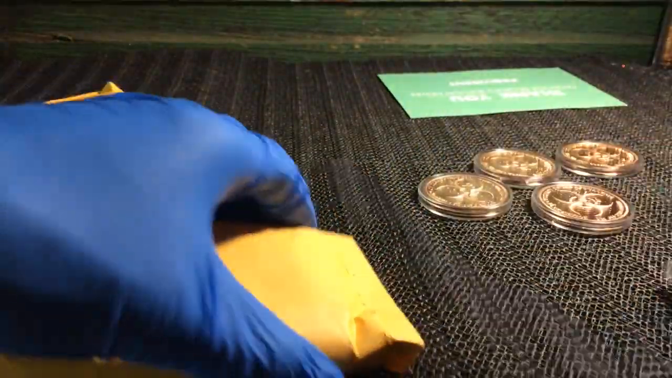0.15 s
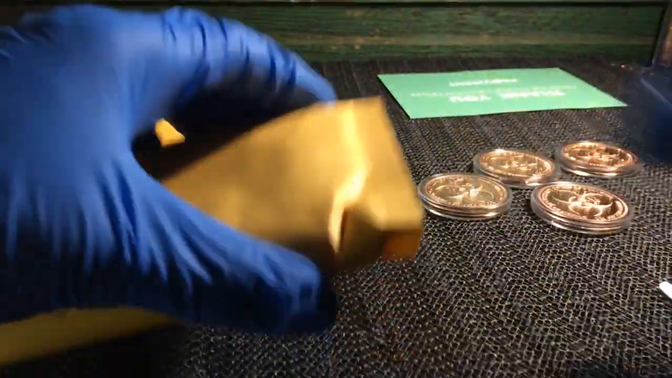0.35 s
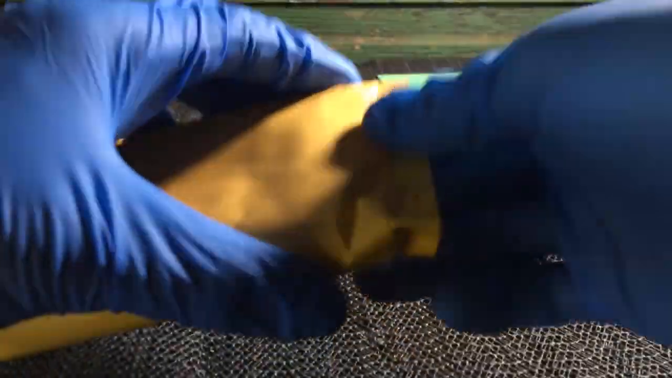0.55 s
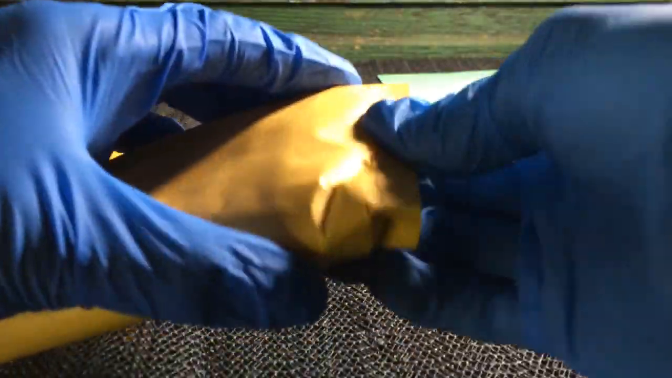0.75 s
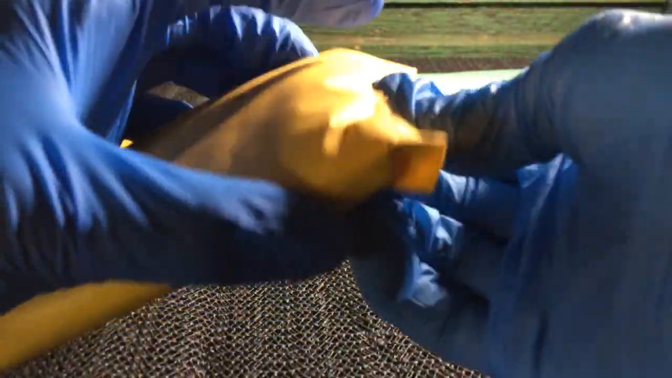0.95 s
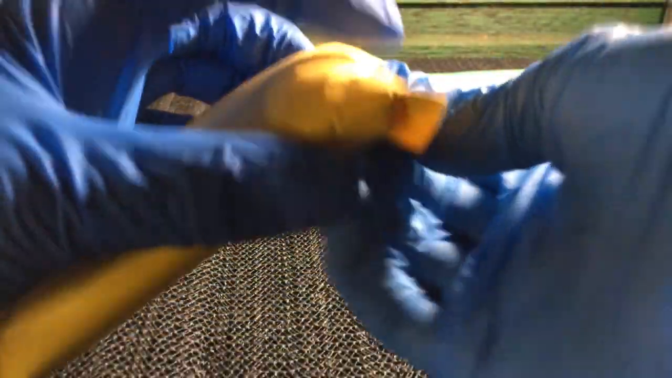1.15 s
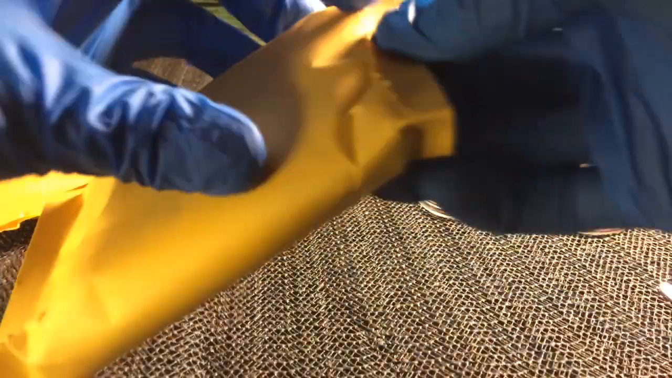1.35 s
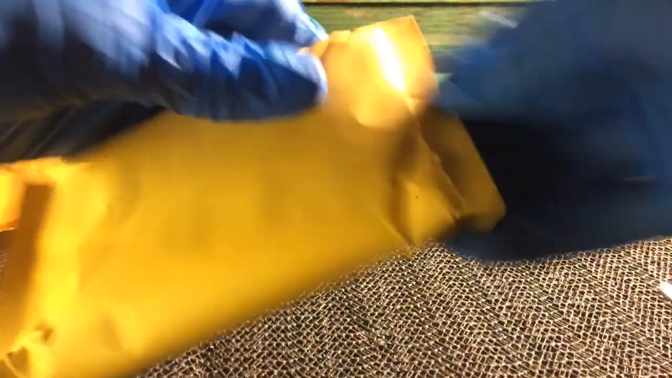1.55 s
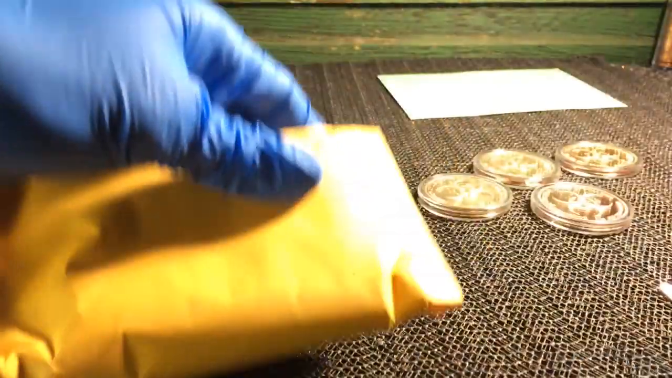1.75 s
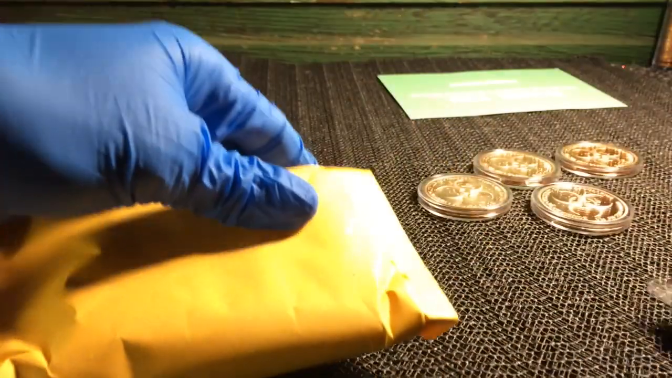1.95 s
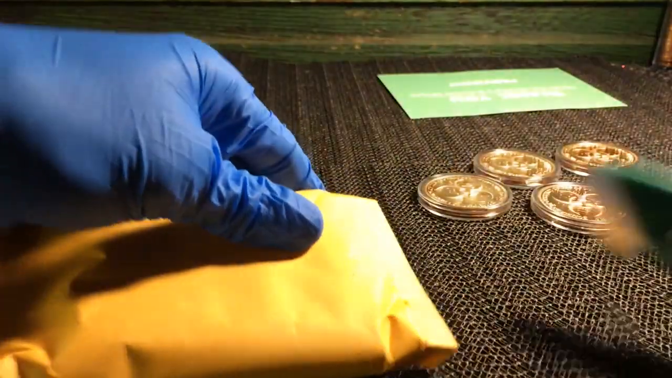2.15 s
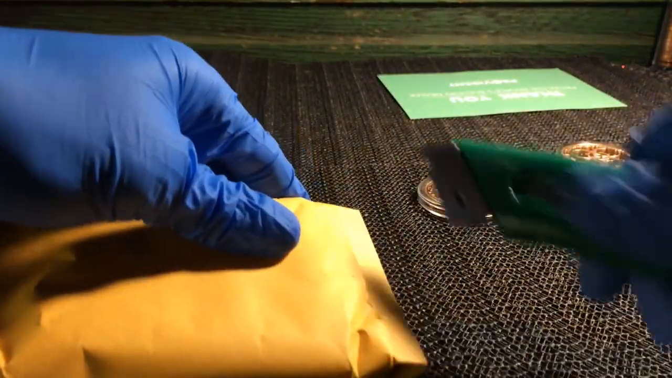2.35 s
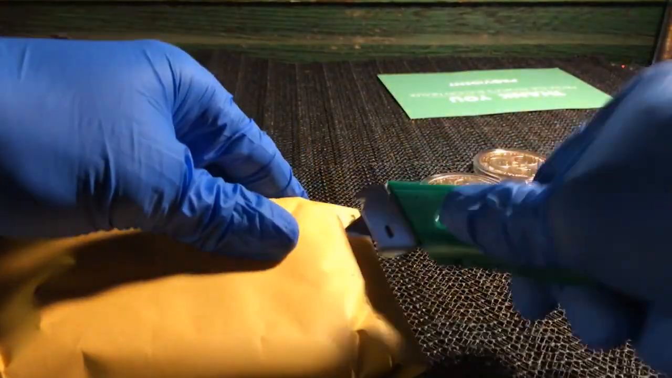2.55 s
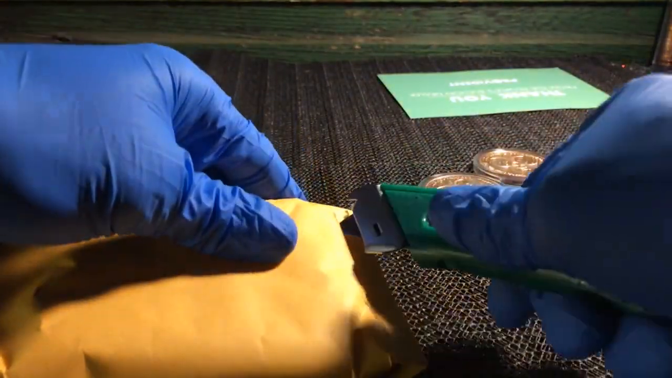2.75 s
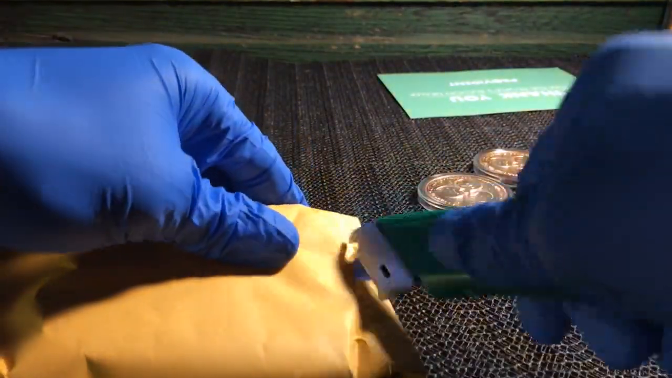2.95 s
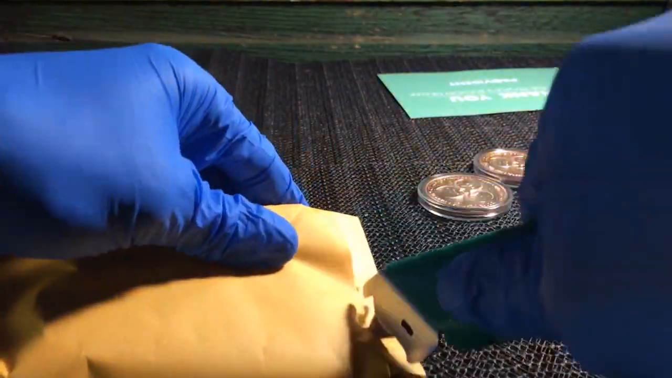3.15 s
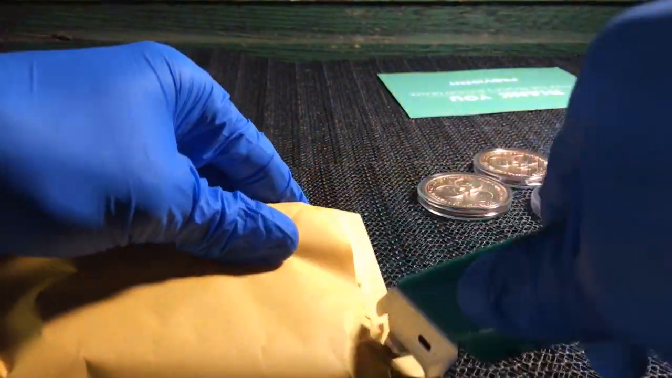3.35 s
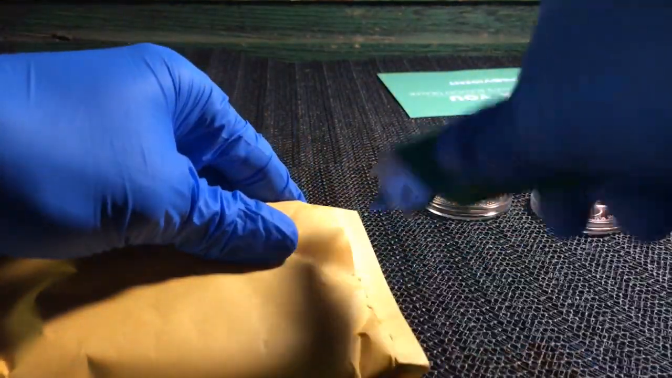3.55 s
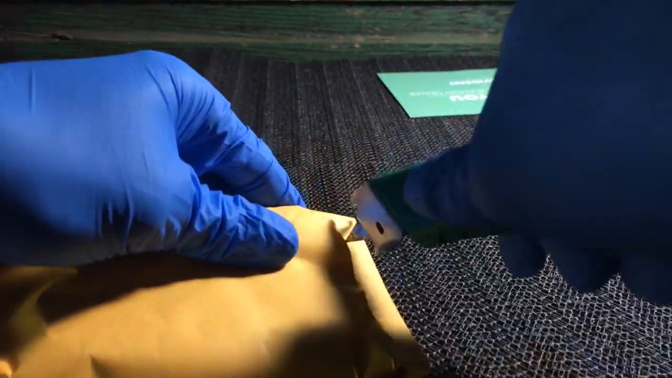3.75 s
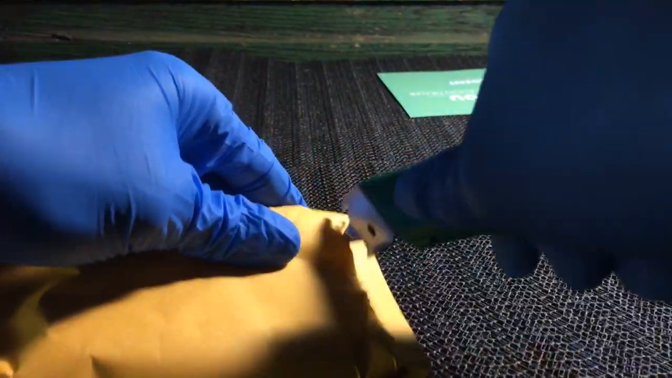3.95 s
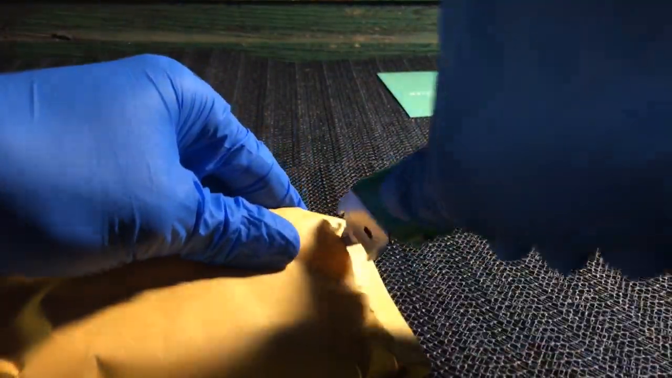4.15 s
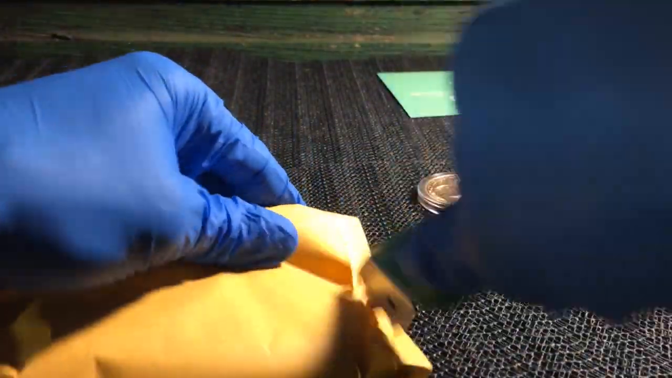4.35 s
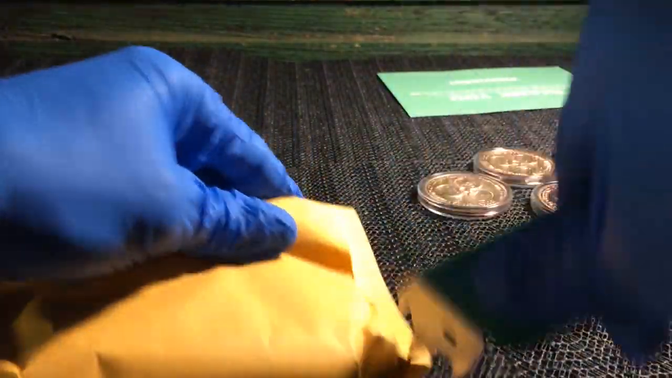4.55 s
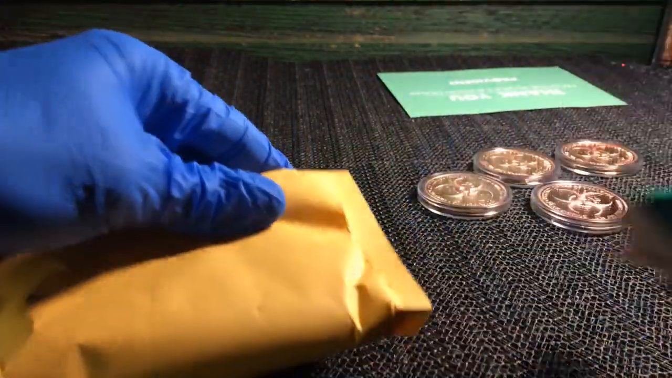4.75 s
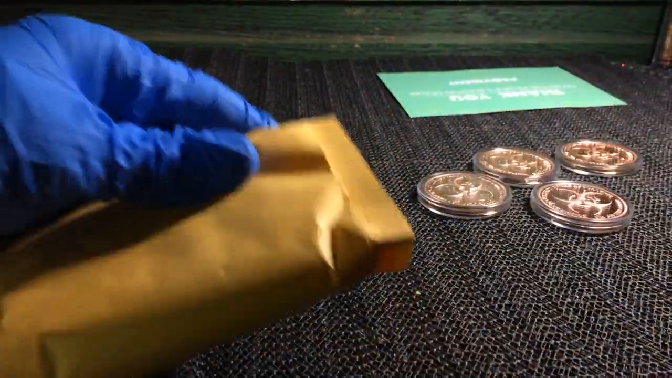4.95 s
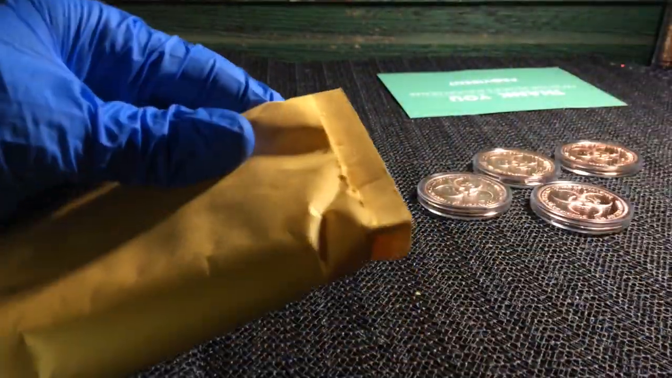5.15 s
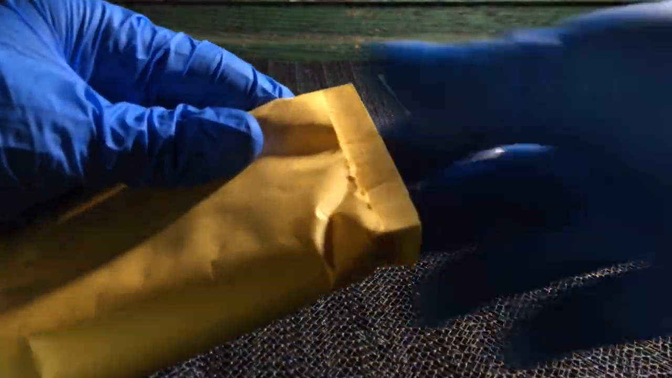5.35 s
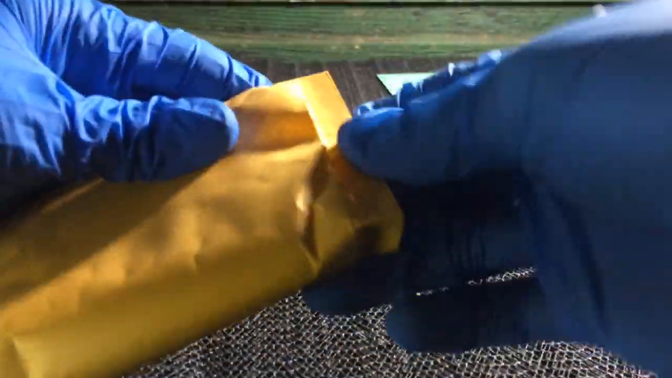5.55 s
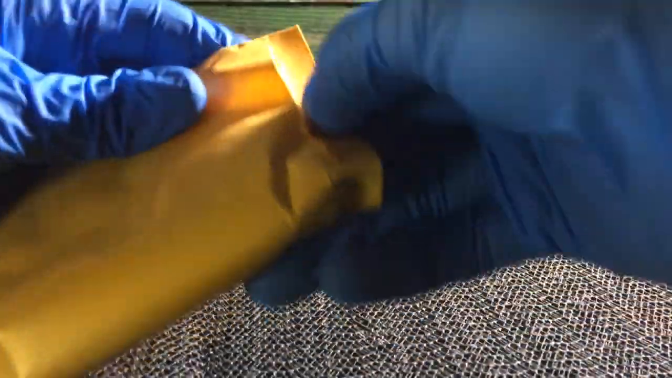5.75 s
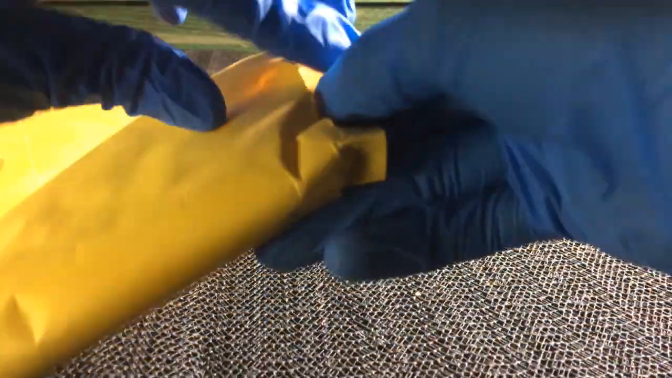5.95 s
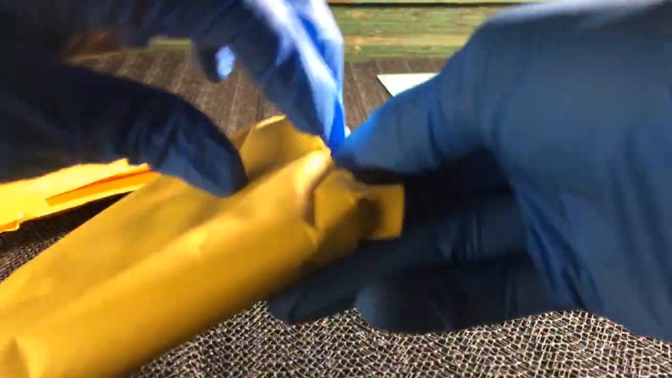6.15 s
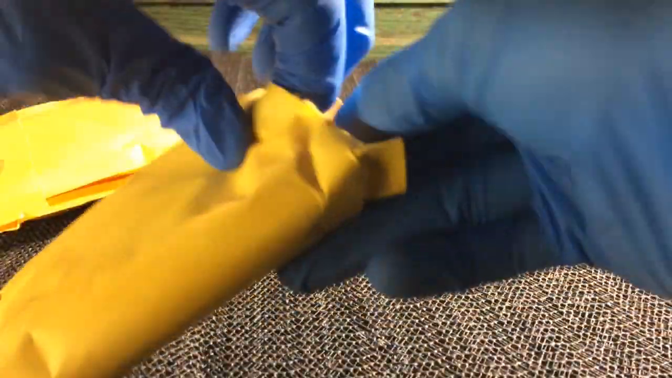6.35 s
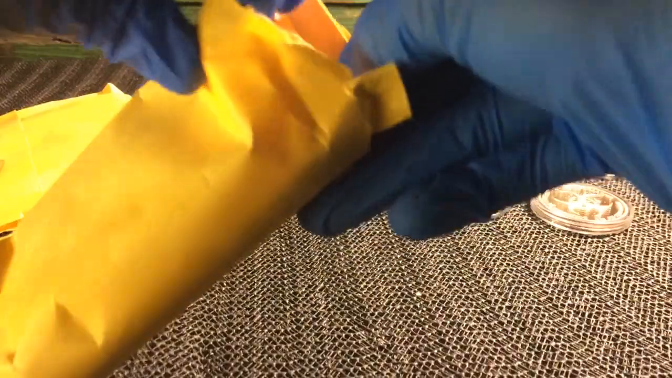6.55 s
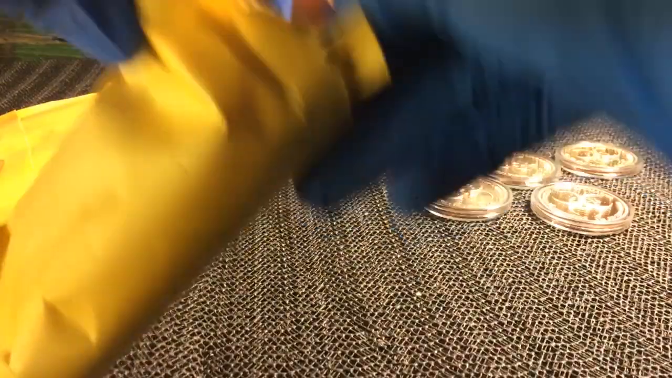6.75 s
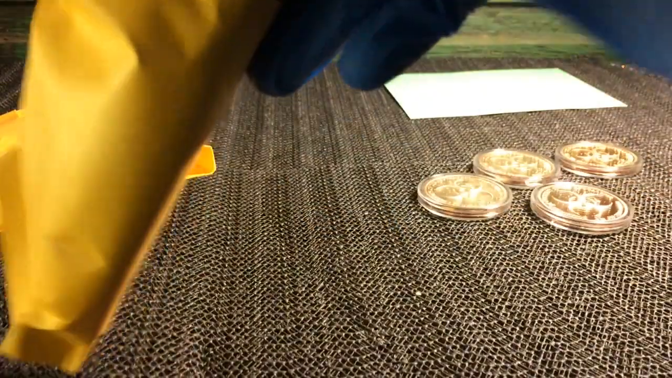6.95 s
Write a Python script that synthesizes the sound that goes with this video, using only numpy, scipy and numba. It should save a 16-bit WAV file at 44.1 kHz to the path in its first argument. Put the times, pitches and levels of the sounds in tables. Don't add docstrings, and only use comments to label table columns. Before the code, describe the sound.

A padded paper envelope is handled very close to a phone in a small, quiet room with faint air noise and low rumble. From 0 to 1.7 s the stiff paper rubs and crackles irregularly, with a strong rub near 0.56 s, sharp crease snaps around 0.75-1.05 and 1.4 s, and soft padded thuds on the table. It thins to light rustle until 2.4 s. At 2.46 and 2.51 s a cutter slider gives two loud, bright clicks with a short handle knock. Fine crackles and a rasping slit run from 2.9 to 3.25 s, with more snaps to 3.5 s. A sharp tick at 4.0 s leads to a heavy, coarse rip at 4.35-4.6 s. Near quiet follows until 5.0 s, then gentle crinkling and a few soft bumps. From 6.35 to 6.6 s brittle tearing snaps crowd together loudly, easing into rustle and a faint creak by 7 s.

```python
import sys
import numpy as np
from scipy import signal
from scipy.fft import rfft, irfft
from scipy.io import wavfile
from scipy.ndimage import uniform_filter1d
from numba import njit

SR = 44100
rng = np.random.default_rng(int(sys.argv[2]) if len(sys.argv) > 2 else 0)


def voltage_ratio(level):
    return 10 ** (np.asarray(level, float) / 20)


def wrap_up_sound(samples):
    columns = np.atleast_2d(samples).T
    tamed = np.clip(columns, -1, 1)
    steps = np.round(tamed * 32767).astype(np.int16)
    wavfile.write(sys.argv[1], SR, steps)


N = 308700


def band(x, lo_hz, hi_hz):
    y = signal.sosfilt(signal.butter(2, [lo_hz, min(hi_hz, .49 * SR)], "band", fs=SR, output="sos"), x)
    return y / np.sqrt(np.mean(y ** 2))


def noise(lo_hz, hi_hz):
    return band(rng.standard_normal(N), lo_hz, hi_hz)


def clicks(s, size):
    return np.bincount(np.clip((s * SR).astype(int), 0, N - 1), size, N)


@njit
def rings(start, hz, t60, size, rise):
    y = np.zeros(N)
    for k in range(len(start)):
        turn = np.exp(2j * np.pi * hz[k] / SR - np.log(1000) / (t60[k] * SR))
        z = size[k] + 0j
        for i in range(min(int(t60[k] * SR), N - start[k])):
            y[start[k] + i] += z.imag * min(1., (i + 1) / (rise[k] * SR)) ** 2
            z *= turn
    return y


def strike(s, hz, t60, db, rise):
    start = (np.asarray(s) * SR).astype(np.int64)
    return rings(start, 1. * hz, t60 + 0. * hz, voltage_ratio(db) + 0. * hz, rise + 0. * hz)


def fade(x, t60):
    return signal.lfilter([1], [1, -np.exp(-np.log(1000) / (t60 * SR))], x)


def walk(rate):
    k = int(SR / rate)
    held = np.repeat(rng.standard_normal(N // k + 1), k)[:N]
    return uniform_filter1d(uniform_filter1d(held, k), k // 2) * np.sqrt(2)


@njit
def svf(x, hz, damp):
    y, b, l = np.empty(len(x)), 0., 0.
    for i in range(len(x)):
        g = np.tan(np.pi * hz[i] / SR)
        v = (b + g * (x[i] - l)) / (1 + g * (g + damp))
        b, l, y[i] = 2 * v - b, l + 2 * g * v, damp * v
    return y


# (frequency [Hz], level [dB per Hz])
ROOM_COLOUR = [(18, -47), (30, 6), (93, -2.5), (135, -16.5), (270, -11), (1670, -25.5), (6900, -28),
               (16000, -28.5)]


def hush():
    hz, db = np.transpose(ROOM_COLOUR)
    f = np.maximum(np.arange(N // 2 + 1) * SR / N, 1)
    colour = voltage_ratio(np.interp(np.log(f), np.log(hz), db))
    air = irfft(rfft(rng.standard_normal(N)) * colour, N)
    rumble = noise(45, 160) * voltage_ratio(-70.5 + 2.2 * walk(4.4))
    return air * voltage_ratio(-65) / np.std(air) + rumble


# (time [s], level [dB],
# brightness, fibres over panel [dB], ringing facet [Hz])
PAPER_GRIPS = [(0.0, -47, 3.5, 3450), (0.065, -55, -2, 3430), (0.094, -50, -8, 1770),
               (0.131, -43.5, 6, 1600), (0.193, -49.5, 1, 1660), (0.26, -52, -4, 2000),
               (0.355, -72, 3, 2260), (0.489, -60.5, 8, 2320), (0.53, -73, 15, 2300),
               (0.558, -30.5, 9.5, 2320), (0.585, -48, 6, 940), (0.652, -55.5, 2, 905),
               (0.727, -43.5, -6, 890), (0.74, -60, 3, 900), (0.757, -47.5, 4, 3830),
               (0.963, -48, 14.5, 5040), (1.075, -46.5, 19, 4900), (1.125, -53.5, 17, 5040),
               (1.16, -55.5, 4, 4300), (1.277, -48.5, 2, 4020), (1.311, -42.5, 3, 3330),
               (1.329, -37, 12, 3900), (1.367, -44, 7, 3630), (1.43, -39, 2, 3320), (1.495, -45, 8, 3300),
               (1.519, -55, 7, 980), (1.54, -49, 6, 990), (1.573, -40, 13, 1200), (1.649, -34, 7.5, 1060),
               (1.712, -51, -2, 4140), (1.766, -65, 0, 5190), (1.834, -50.5, 0.5, 2750),
               (1.937, -62, -6, 3540), (2.039, -52.5, -8, 3550), (2.093, -63.5, -6, 3230),
               (2.15, -55, -2.5, 1640), (2.252, -52.5, 1, 2660), (2.35, -61, -2, 2640),
               (2.39, -51.5, 0.5, 3320), (2.452, -44.5, 4, 3170), (2.508, -37, 19.5, 3200),
             (2.527, -48.5, 12, 3060), (2.579, -64, 10, 3100), (2.634, -36, 11, 3460),
             (2.654, -77, -17, 1050), (2.735, -62.5, -6, 950), (2.821, -60, 4, 2700),
             (2.917, -49.5, 14, 1300), (2.959, -43.5, 4, 5600), (3.09, -29.5, 3, 1430),
             (3.128, -45, 0, 5600), (3.258, -60, 0, 3400), (3.312, -48.5, 8, 2560), (3.352, -43, -6, 1230),
             (3.384, -56, 18, 2590), (3.412, -62.5, 9, 1170), (3.47, -49, 5, 3120), (3.491, -36, 3, 3080),
             (3.511, -30, -1.5, 955), (3.531, -76, -4, 1526), (3.608, -91, -7, 5750), (3.802, -50, 1, 3650),
             (3.814, -78, -18, 3670), (3.931, -64, -9, 3380), (3.987, -35.5, -5, 3520),
             (4.014, -57.5, 9, 3360), (4.072, -63, -6, 1050), (4.21, -55, -9, 1090),
             (4.233, -65, -18, 2240), (4.258, -61.5, -2, 2140),
               (4.352, -45, -2, 910), (4.374, -27.5, 2, 830), (4.416, -33, -9, 890),
              (4.437, -27, -2.5, 1010), (4.459, -43, 4, 1040), (4.485, -60, -1, 2130),
              (4.528, -32.5, -6, 855), (4.572, -35.5, 3, 890), (4.599, -40.5, -4, 890),
              (4.625, -52.5, -4, 2000), (4.661, -57.5, -2, 1900), (4.989, -55, -13, 1940),
              (5.02, -53, 1, 1910), (5.085, -46, 1, 3100), (5.132, -54, -7, 3400), (5.16, -59, -2, 2000),
              (5.199, -52.5, -12.5, 3540), (5.267, -68, -12, 4040), (5.448, -40.5, 2, 1060),
              (5.495, -61, 0, 980), (5.52, -46, 2.5, 980), (5.559, -48.5, -6, 2620), (5.591, -58, -1, 990),
              (5.625, -50, 0, 2600), (5.66, -53, -2, 990), (5.699, -46, 14, 4230), (5.734, -39, 5.5, 2520),
              (5.769, -47, 7, 4140), (5.847, -51.5, -6, 2000), (5.866, -38, 7.5, 2520),
              (5.92, -49, -11, 2540), (5.964, -58.5, 2, 990), (6.014, -55, 0, 4200), (6.065, -53, 3, 2540),
              (6.144, -46, 4, 1560), (6.211, -45.5, 3, 1510), (6.261, -47.5, -4.5, 1160),
              (6.31, -51, 4, 2000), (6.36, -39, 4, 2970), (6.409, -46.5, 6, 2830), (6.492, -38.5, 2, 4300),
              (6.559, -42, 6, 1630), (6.613, -49, 7, 1810), (6.686, -39.5, 8, 1550), (6.745, -48, 5, 1800),
              (6.81, -52, -2, 1740), (6.845, -44.5, -11, 1770), (6.875, -41, -17, 840),
              (6.913, -40, -8, 3700), (6.955, -52.5, -7, 1870)]


def grips():
    s, db, bright_db, hz = np.transpose(PAPER_GRIPS)
    return s, db, db - 4 - bright_db / 2, db - 2 + bright_db / 2, hz


def let_go(db):
    release_s = 0.0077
    gain = voltage_ratio(db)
    return np.maximum(gain, fade(gain, release_s) * np.log(1000) / (release_s * SR))


def friction(sheet_db, panel_db, fibre_db, now, since, grainy):
    slips_per_s, spread_db = 500, 1
    chance = rng.random((int(slips_per_s * N / SR), 7)).T
    slip_s = chance[0] * N / SR
    size_db = np.minimum(-spread_db * np.log(1 - chance[1]), 13.0)
    bite_db = 1.5 * (np.exp(-since / 0.018) - .3)
    hand_db = 1.89 * walk(60)
    # (grip level [dB], low [Hz], high [Hz], slip t60 [s], trim [dB])
    parts = (
        (sheet_db, 2000, 4900, 0.013, -5.5),
        (panel_db, 520, 2110, 0.015, -3.0),
        (fibre_db, 6500, 16000, 0.0086, -2.5),
        (panel_db, 68.6, 510, 0.03, -16.0),
        ((sheet_db + fibre_db) / 2, 4300, 7950, 0.01, -5.5),
    )
    out = 0
    for (db, lo_hz, hi_hz, t60, trim_db), tint in zip(parts, chance[2:]):
        slips = fade(clicks(slip_s, voltage_ratio(size_db + 2.4 * (tint - .5))), t60)
        gate = 1 - grainy + grainy * slips / np.sqrt(np.mean(slips ** 2))
        grains = band(gate * noise(lo_hz, hi_hz), lo_hz, hi_hz)
        held_db = uniform_filter1d(db[now] + bite_db, int(0.012 * SR))
        out = out + grains * let_go(held_db) * voltage_ratio(trim_db + hand_db + 2.4 * walk(30))
    return out


def loose_ticks(sheet_db, panel_db, fibre_db, now, grainy):
    when, pitch, size = rng.random((560, 3)).T
    at = (when * N).astype(int)
    grip = now[at]
    hz = 700 * 18.0 ** pitch
    region = (hz > 2000) * 1 + (hz > 7000)
    around_db = np.choose(region, [panel_db[grip], sheet_db[grip], fibre_db[grip]])
    db = around_db + 6.0 + 6.0 * grainy[at] * size ** 2
    s = when * N / SR
    overtone = strike(s, np.minimum(2.0 * hz, 15000), 0.0027, db + 2.0, .0001)
    return strike(s, hz, 4.1 / hz + 0.00058, db + 5.0, 0.66 / hz) + overtone


def facet_ring(x, facet_hz, bright_db, now, since):
    hz = uniform_filter1d(facet_hz[now], 800) * 0.994 ** walk(22)
    rest = 0.61
    free = rest + (1 - rest) * np.exp(-since / 0.081)
    free = free * voltage_ratio(-0.17 * bright_db[now].clip(-10, 8))
    small_facet = np.minimum(2300 / hz, 1)
    return uniform_filter1d(free, size=200) * svf(x, hz, 0.18) * small_facet


def rustle():
    s, sheet_db, panel_db, fibre_db, facet_hz = grips()
    t = np.arange(N) / SR
    now = (np.searchsorted(s, t, "right") - 1).clip(0)
    since = t - s[now]
    grainy = np.clip((-31 - sheet_db[now]) / 29.0, .3, .7)
    rub = friction(sheet_db, panel_db, fibre_db, now, since, grainy)
    loose = loose_ticks(sheet_db, panel_db, fibre_db, now, grainy)
    paper = rub + loose + 1.358 * snaps() + small_creases()
    ring = facet_ring(rub + loose + 0.53 * paper, facet_hz, fibre_db - panel_db, now, since)
    return 0.7 * paper + 0.71 * ring


# (time [s], level [dB], facet [Hz],
# brightness, fibre crack over panel pop [dB])
CREASE_SNAPS = [(0.0954, -8, 5160, -1), (0.1587, -22.5, 4930, 13), (0.2299, -24.5, 2150, 13.5),
                (0.5938, -20.5, 5000, 15), (0.748, -31.5, 3880, 8), (0.763, -5.5, 3570, 6),
                (0.7962, -16, 2000, -23), (0.799, -28.5, 1970, -26), (0.8063, -11, 1990, -13.5),
                (0.823, -11, 7000, -12), (0.862, -25.5, 2240, -13), (0.872, -24.5, 4940, -3),
                (0.9179, -6, 3930, 2), (0.9315, -17, 1910, -11), (0.9367, -15, 3160, -4),
                (0.9432, -16, 2000, -25), (1.015, -22, 4400, -27), (1.0505, -9, 3170, 21.5),
                (1.1194, -18, 5600, 44), (1.1704, -29, 6200, 34), (1.3812, -19, 3060, -16),
                (1.393, -9, 5800, 16.5), (1.405, -14, 4530, 27), (1.485, -12, 1880, -21),
                (1.6505, -14.5, 2790, -6), (1.695, -13, 3100, -22), (2.096, -32, 4910, 39),
                (2.3928, -18.5, 6100, 19.5), (2.463, -1, 4340, 15.5), (2.463, -9, 5110, 20.5),
                   (2.511, -0.5, 3150, 24.5), (2.6457, -21, 3620, -8), (2.8315, -17, 1980, -39),
                   (2.887, -28.5, 3730, 5), (2.9168, -26.5, 6630, 19.5), (2.9206, -26, 7320, 36),
                   (2.928, -24, 7400, 30), (2.9425, -29, 7300, 27.5), (2.9603, -16, 3880, 23),
                   (2.9816, -22.5, 5170, -2.5), (2.985, -16, 3920, 21), (3.018, -19, 4800, 16),
                   (3.034, -15, 6200, 8), (3.039, -14.5, 4600, 19.5), (3.056, -16.5, 5240, 24),
                   (3.078, -15, 6800, 12.5), (3.1035, -8.5, 3420, -8), (3.1263, -7.5, 7050, 8),
                   (3.1536, -22, 5800, 23.5), (3.1817, -20.5, 6500, 20), (3.1943, -13.5, 1930, -34),
                   (3.201, -23.5, 5900, 29.5), (3.2352, -17, 3370, -29), (3.242, -14.5, 2580, 35.5),
                (3.3511, -21.5, 6900, 3), (3.3603, -7, 2760, 30), (3.37, -22, 2730, -10),
                    (3.374, -20, 5500, -4), (3.491, -14, 5430, 24), (3.5227, -19.5, 2960, -8),
                    (3.5975, -34, 7320, 17), (3.8, -25, 3620, 3), (3.9372, -31.5, 3320, -8),
                    (3.9887, -24, 3360, -5), (4.0034, -6, 3500, 20), (4.0324, -22.5, 3530, 21),
                    (4.071, -27.5, 2420, -41), (4.1738, -36.5, 7000, 16), (4.215, -31, 1980, -19.5),
                    (4.2334, -20.5, 2240, -15), (4.405, -2, 3300, -4.5), (4.4077, -2.5, 3400, 32),
                    (4.41, -6, 3530, -4.5), (4.4332, -11, 6600, -3.5), (4.535, -22.5, 2700, -5.5),
                    (4.691, -32, 2000, -29.5),
                (4.775, -37.5, 2200, -17), (4.9667, -40, 1970, -8), (4.9906, -14.5, 1900, 24),
              (5.0133, -21.5, 2720, -19), (5.086, -21.5, 4840, 21), (5.105, -41, 3100, 18),
              (5.1276, -24, 2700, 19), (5.5627, -21.5, 7060, -31), (5.7016, -25, 4200, 7),
              (5.712, -25, 4400, 30), (5.7299, -25, 2390, -19), (5.7771, -21, 7320, 38),
              (5.7863, -23, 6120, 36), (5.792, -28.5, 2000, -40), (5.907, -13.5, 2500, -27),
              (5.9151, -8.5, 2530, -24.5), (6.106, -33, 7400, 7), (6.3045, -27, 2000, -37),
                (6.363, -4, 2810, 18), (6.3894, 1, 4300, 19.5), (6.3947, -5, 3360, 14.5),
              (6.402, -7, 3530, 46), (6.4515, -3, 2570, 28.5), (6.4938, 0.5, 2600, 23.5),
              (6.499, -10, 2840, 22), (6.509, -7.5, 2500, 31), (6.5138, 1.5, 2580, 35),
              (6.522, 0.5, 2560, 31), (6.529, -21, 2150, 20), (6.5314, -5, 2100, 14.5),
              (6.548, 1, 2840, 21), (6.5525, -7, 1940, 17), (6.5621, 1.5, 2600, 44),
              (6.5796, -13.5, 3620, 24), (6.59, -14.5, 2000, -6), (6.604, -13.5, 7060, 42),
              (6.6115, -18, 4050, 37), (6.6241, -36, 6630, 33), (6.6464, -20, 4040, 13),
              (6.651, -24, 3020, 23), (6.685, -16.5, 2860, 30), (6.6928, -15, 2600, 13),
              (6.705, -13.5, 7000, 36), (6.8, -27, 4390, 24)]


def creases():
    every_snap = CREASE_SNAPS
    s, db, hz, bright_db = np.transpose(every_snap)
    loss = np.where(bright_db > 0, 0.83, 0.72)
    facet_db = db + 4 - loss * (np.abs(bright_db) - 12).clip(0)
    pop_db = db + 1.06 - 10 * np.log10(1.5 + 10 ** (bright_db / 10))
    return s, facet_db, hz, pop_db, pop_db + bright_db


def snaps():
    s, db, hz, pop_db, crack_db = creases()
    chance = rng.standard_normal((len(s), 4)).T
    facet = strike(s, hz, 8.13 / hz, db + 6.5, 1.14 / hz)
    second_s = s + 0.00078 * 1.4 ** chance[3]
    second = strike(second_s, hz * 1.202 ** chance[1], 8.2 / hz, db + 2.0, 1 / hz)
    near_hz = hz * 1.5 ** chance[0].clip(-1, 1)
    near_db = db - 3.0 + 3.0 * chance[1].clip(-1, 1)
    neighbour = strike(s + .0001, near_hz, 9.0 / hz, near_db, .0005)
    pop_hz = 960 * 1.155 ** chance[2].clip(-2, 2)
    panel = strike(s, pop_hz, 5.83 / pop_hz, pop_db + 4.0, 0.54 / pop_hz)
    crack = fade(fade(clicks(s, voltage_ratio(crack_db - 13.5)), 0.0005), 0.0031) * noise(6000, 18100)
    shiver = fade(clicks(s + 0.0016, voltage_ratio(db - 16.0)), 0.0082) * noise(2300, 6500)
    flutter = fade(clicks(s + 0.0015, voltage_ratio(pop_db - 12.5)), 0.014) * noise(650, 1700)
    fizz = fade(clicks(s + 0.0028, voltage_ratio(crack_db - 28.0)), 0.0073) * noise(7000, 14000)
    bass_cut = signal.butter(2, 320, "high", fs=SR, output="sos")
    sheet = signal.sosfilt(bass_cut, facet + second + neighbour + panel)
    return sheet + crack + shiver + flutter + fizz


# (time [s], level [dB], pitch [Hz], length [cycles until silent])
TABLE_THUDS = [(0.257, -41, 90.5, 5.3), (0.307, -32.5, 97.5, 8), (0.915, -24, 215, 3.5),
               (1.373, -34, 203, 5.4), (1.64, -43, 140, 7.4), (1.847, -39, 99, 14.3),
               (1.919, -43.5, 74, 5.9), (2.239, -42.5, 70, 3.3), (2.456, -26, 173, 3.5),
               (2.503, -33, 166, 6.2), (2.643, -40, 442, 14), (4.403, -37.5, 71, 9.5),
               (4.554, -41.5, 108, 13), (5.141, -44.5, 93, 23), (5.224, -32, 210.6, 16.6),
               (5.252, -28.5, 106, 5.3), (5.285, -39, 93.5, 7), (5.731, -42.5, 124, 4.6),
               (6.355, -25, 142, 3.7), (6.884, -46, 113, 6.4)]


def thuds():
    s, db, hz, cycles = np.transpose(TABLE_THUDS)
    top = strike(s, hz, cycles / hz, db + 11.0, 1.2 / hz)
    return top + strike(s + .004, 2.1 * hz, 0.87 * cycles / hz, db - 6.0, 0.0014)


# (time [s], level [dB], pitch [Hz])
CREASE_TICKS = [(0.321, -29, 1680), (0.616, -31, 1010), (0.63, -22, 910), (0.66, -30, 872), (0.67, -28, 920),
                (0.712, -28, 3810), (0.729, -32, 3450), (0.885, -17.5, 3830), (1.076, -20.5, 4800),
                (1.104, -29, 4960), (1.74, -24.5, 4590), (1.831, -33.5, 2870), (2.021, -32.5, 590),
                (2.071, -26.5, 4280), (2.684, -35, 3600), (2.971, -26, 9000), (3, -18, 6000),
                (3.007, -15, 6300), (3.014, -20, 6000), (3.227, -18, 8000), (3.327, -30, 12300),
                (3.363, -11.5, 1020), (3.379, -17, 864), (3.389, -16, 12800), (3.4, -30, 5800),
                (3.516, -18, 1560), (3.535, -21.5, 7840), (3.584, -36, 7620), (3.806, -20, 3600),
                (3.838, -35.5, 6070), (3.898, -39.5, 1150), (4.042, -29, 4320), (4.049, -30, 4270),
                (4.058, -25.5, 9240), (4.066, -31, 706), (4.095, -33, 12100), (4.291, -35, 13100),
                (4.355, -27, 890), (4.428, -15, 3200),
                (4.445, -4, 1070), (4.55, -11.5, 867), (4.586, -16.5, 2050), (4.649, -26.5, 2720),
              (4.871, -35, 1780), (5.374, -34, 870), (5.454, -21, 1080), (5.472, -16, 2420),
              (5.531, -23.5, 900), (5.588, -32, 1180), (5.742, -19, 5380), (5.759, -20.5, 2550),
              (5.806, -25, 9700), (5.823, -31, 6030), (5.835, -22, 10200), (6.021, -23, 4240),
              (6.074, -29.5, 826), (6.095, -29, 9500), (6.228, -22, 8600), (6.263, -28, 1200),
              (6.333, -22, 2850), (6.4227, -13, 2900), (6.467, -21, 3200), (6.473, -30, 2800),
              (6.478, -22, 9000), (6.5395, -13, 2300), (6.725, -17, 3170), (6.859, -27, 730),
              (6.887, -29, 851), (6.893, -26, 676), (6.902, -25, 1890)]


def small_creases():
    s, db, hz = np.transpose(CREASE_TICKS)
    crack_db = db - 19.5 + 2.5 * np.log2(hz / 4000)
    crack = fade(fade(clicks(s, voltage_ratio(crack_db)), .0005), 0.0026) * noise(3000, 18000)
    tail = fade(clicks(s + 0.00051, voltage_ratio(db - 16.0)), 0.015) * noise(900, 7000)
    return strike(s, hz, 5.3 / hz + .0015, db + 1.0, 1.0 / hz) + crack + tail


# (time [s], level [dB])
SLIDER_CLICKS = [
    (2.463, 10),
    (2.51, 10.5),
    (2.5204, -18.5),
]
# (pitch [Hz], level [dB], t60 [s])
HANDLE_MODES = [
    (3360, 2.5, 0.012),
    (3170, -27.5, 0.12),
    (4910, -1.5, 0.011),
]


def cutter():
    s, db = np.transpose(SLIDER_CLICKS)
    out = 0
    for hz, mode_db, t60 in HANDLE_MODES:
        out = out + strike(s, np.full(len(s), hz), t60, db - 16.0 + mode_db, 0.00076)
    return out


# (time [s], length [s], level, rms [dB], pitch [Hz])
FINGER_CREAKS = [(3.096, 0.01, -29, 6020), (3.108, 0.014, -28.5, 12300), (3.233, 0.0065, -24.5, 860),
                 (4.384, 0.027, -26, 860), (4.559, 0.012, -30, 875), (5.085, 0.015, -36, 1650),
                 (5.086, 0.0091, -36, 2750), (5.102, 0.012, -37, 1930), (6.519, .006, -24, 2520),
                 (6.766, .22, -51, 1800), (6.915, .045, -52, 3300)]


def creaks():
    out, rub = np.zeros(N), rng.standard_normal(N)
    for s, length, db, hz in FINGER_CREAKS:
        along = np.linspace(0, 1, int(length * SR))
        first = int(s * SR)
        span = slice(first, first + len(along))
        bend_hz = hz * 1.17 ** (along - .5)
        damp = 0.11 * np.sqrt(hz / 1700)
        sung = svf(svf(rub[span], bend_hz, damp), bend_hz, 2 * damp)
        swell = np.sin(np.pi * along ** 0.45) ** .5
        out[span] += sung / np.std(sung) * voltage_ratio(db) * swell
    return out


def room_wash(near):
    t = np.arange(SR // 4) / SR
    decay = np.exp(-np.log(1000) * t / 0.21) * (t > .004)
    walls = band(rng.standard_normal(len(t)), 260, 5600) * decay
    return signal.fftconvolve(near, walls)[:N] * voltage_ratio(-55.0)


def scene():
    near = rustle() + cutter()
    return (near + room_wash(near) + thuds() + hush() + creaks())[None]


def band_limit(x):
    return signal.sosfilt(signal.butter(12, 16860, fs=SR, output="sos"), x)


def record(dry):
    no_bass = signal.sosfilt(signal.butter(2, 42, "high", fs=SR, output="sos"), dry)
    rounded = np.tanh(1.33 * no_bass) / 1.247
    mix = signal.sosfilt(signal.ellip(8, .2, 30, 15800, fs=SR, output="sos"), rounded)
    return band_limit(mix)


dry = scene()
out = record(dry)
wrap_up_sound(out)
```